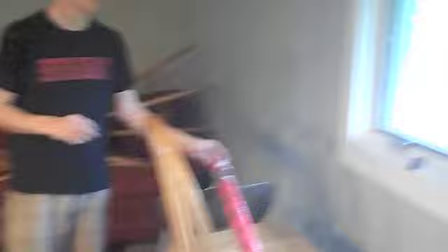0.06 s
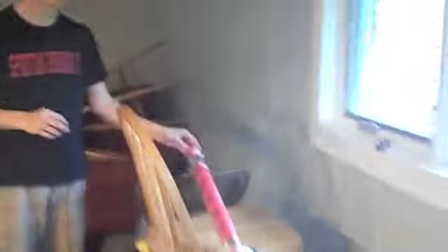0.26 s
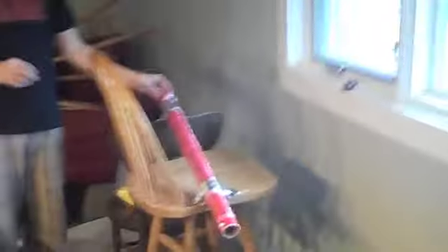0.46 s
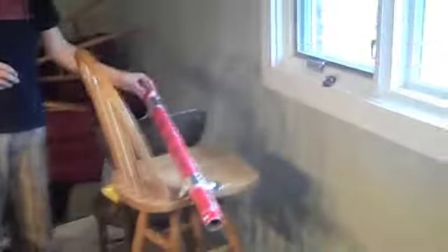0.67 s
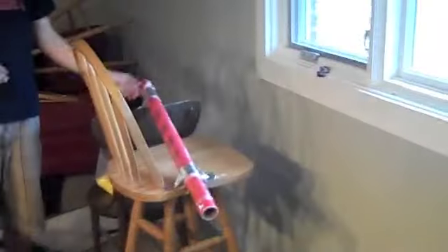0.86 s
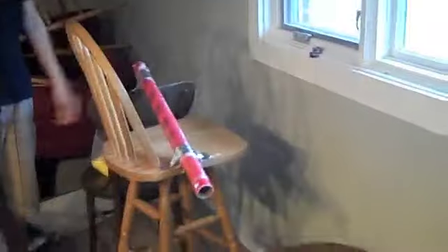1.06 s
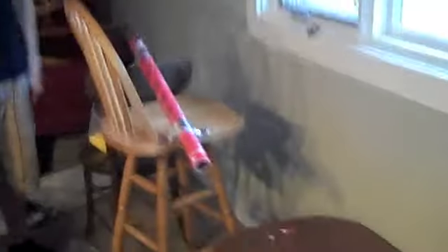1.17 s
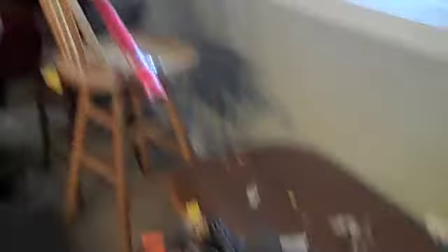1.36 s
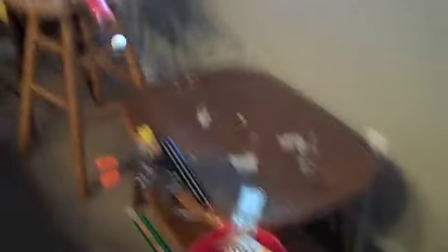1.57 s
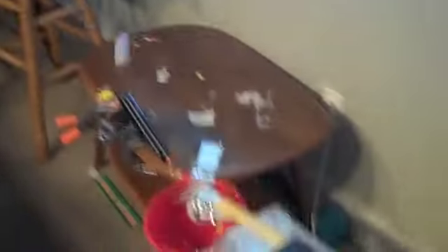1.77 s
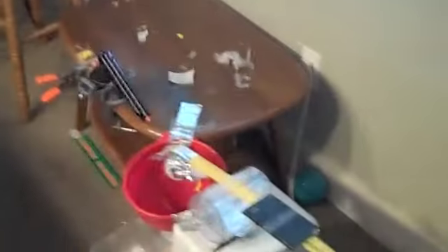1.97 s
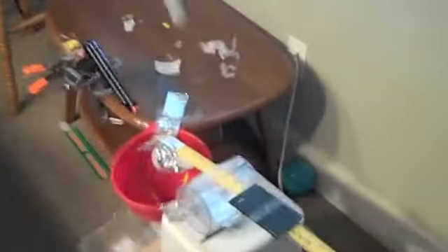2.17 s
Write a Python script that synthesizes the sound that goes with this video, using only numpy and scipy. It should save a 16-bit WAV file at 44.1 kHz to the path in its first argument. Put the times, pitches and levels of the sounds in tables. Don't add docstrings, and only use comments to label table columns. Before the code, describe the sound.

A spring mousetrap snaps at about 1.7 seconds: a sudden loud, bright metal clack, several contacts chattering within a twentieth of a second over hollow wooden knocks, then a short bare-room ring. Before it, tiny dry handling ticks come near 0-0.35 and 0.75 seconds, and a hard ball rumbles faintly down a cardboard tube from 0.8, swelling until 1.6. Quiet low room noise continues; a faint rustle follows at 2.15.

```python
import sys
import numpy as np
from scipy import signal
from scipy.fft import rfft, irfft
from scipy.io import wavfile
from scipy.ndimage import uniform_filter1d

SR = 44100
rng = np.random.default_rng(int(sys.argv[2]) if len(sys.argv) > 2 else 0)


def unload_wav(signal):
    wavfile.write(
        sys.argv[1],
        SR,
        np.round(np.clip(np.atleast_2d(signal).T, -1, 1) * 32767).astype(np.int16),
    )


def elevation(decibels):
    levels = np.asarray(decibels, float)
    return 10 ** (levels / 20)


N = 97593


def rms_one(x):
    return x / np.sqrt(np.mean(x ** 2) + 1e-20)


def at_hz(points, hz):
    table_hz, value = np.transpose(points)
    return np.interp(np.log(hz), np.log(table_hz), value)


def drift(rate_hz):
    r = np.exp(-80 * np.pi * rate_hz / SR)
    slow = signal.lfilter([1], [1, -2 * r, r * r], rng.standard_normal(N // 40 + 2002))[2000:]
    return np.interp(np.arange(N) / 40, np.arange(len(slow)), rms_one(slow))


def resonance(x, hz, width_hz):
    r = np.exp(-np.pi * width_hz / SR)
    b = np.array([1, 0, -1]) * (1 - r * r) / 2
    return signal.lfilter(b, [1, -2 * r * np.cos(2 * np.pi * hz / SR), r * r], x + 1e-18)


def ring(x, hz, t60_s):
    r = elevation(-60 / (t60_s * SR))
    w = 2 * np.pi * hz / SR
    return signal.lfilter([0, np.sin(w)], [1, -2 * r * np.cos(w), r * r], x + 1e-18)


def band(x, low_hz, high_hz):
    sos = signal.butter(2, [low_hz, min(high_hz, 0.45 * SR)], "band", fs=SR, output="sos")
    return signal.sosfilt(sos, x + 1e-18)


def grains(shape, rate_per_s, spread_db20):
    size = elevation(spread_db20 * np.minimum(rng.exponential(1, shape), 4)) * rng.choice([-1, 1], shape)
    return rms_one(size * (rng.random(shape) < rate_per_s / SR))


def stereo_bands(likeness, gain):
    out = 0
    edges_hz = 22 * 2 ** np.arange(0, 9.6, 0.5)
    white = rng.standard_normal((2, 2, N))
    for k, (low_hz, high_hz) in enumerate(zip(edges_hz, edges_hz[1:])):
        mid, side = band(white[k % 2], low_hz, high_hz)
        hz = np.sqrt(low_hz * high_hz)
        alike = np.clip(at_hz(likeness, hz), -1, 1)
        out = out + gain(hz) * (np.sqrt(1 + alike) * mid + np.sqrt(1 - alike) * side * [[1], [-1]])
    return out


def rattle(rows, band_hz, cycles, pan_db, dull_db):
    alike = 0.46
    shared, left, right = grains((3, N), 14000, 1.1)
    spray = np.sqrt(alike) * shared + np.sqrt(1 - alike) * np.array([left, right])
    out = np.zeros((2, N))
    t = np.arange(SR // 4) / SR
    for s, db, length_s, hz, ring_db in rows:
        i = int(s * SR)
        n = min(len(t), N - i)
        rise_s = 0.00014 + 4.2 * length_s ** 2
        shape = (np.exp(-t / length_s) * (1 - np.exp(-t / rise_s)))[:n]
        energy = np.sum(shape ** 2)
        burst = spray[:, i:i + n] * shape
        burst = burst * np.sqrt(energy / np.sum(burst ** 2, axis=1, keepdims=True))
        t60_s = cycles / hz
        tone = ring(burst, hz, t60_s)
        ring_energy = energy * t60_s * SR / (4 * np.log(1000))
        tone = tone * np.sqrt(ring_energy / np.mean(np.sum(tone ** 2, axis=1)))
        dull = band(burst.mean(axis=0), 550, 2600)
        sound = band(burst, *band_hz) + elevation(dull_db) * dull + elevation(ring_db) * tone
        out[:, i:i + n] += elevation(db) * sound * elevation([[pan_db / 2], [-pan_db / 2]])
    return out


def trap_wire():
    # (time [s], level [dB], rattle length [s], ringing pitch [Hz], ring level [dB])
    contacts = [(1.7134, -13.5, 0.0017, 3794, -18), (1.7154, -16, 0.0019, 7900, -21.5),
                (1.7178, -20, 0.006, 5200, -22), (1.7232, -1.5, 0.0033, 8200, -28),
                (1.7258, -9.5, 0.0061, 6510, -21), (1.7402, -6, 0.0027, 6370, -12),
                (1.7415, -8.5, 0.0019, 4330, -5), (1.7432, -10, 0.0035, 7560, -19),
                (1.7448, -9, 0.0011, 6430, -21), (1.750, -13, 0.0065, 10080, -9.5),
                (1.7512, -13.5, 0.0025, 6260, -21), (1.7535, -11, 0.003, 7530, -23),
                (1.7558, -16, 0.0021, 6470, -24), (1.760, -18, 0.034, 5845, -29),
                (1.7838, -22.5, 0.0015, 7570, -24.5), (1.7853, -19.5, 0.003, 7700, -24.5),
                (1.7962, -25, 0.0028, 6200, -10)]
    return rattle(contacts, band_hz=(1420, 8200), cycles=36, pan_db=0.1, dull_db=2)


def wooden_base():
    # (time [s], level [dB], pitch [Hz], t60 [s])
    base_knocks = [
        (1.7135, -24.5, 852, .02),
        (1.7243, -6.5, 646, 0.031),
        (1.7315, -4, 821.4, .05),
        (1.7339, -4, 847, 0.016),
        (1.7440, -7.5, 748, 0.019),
    ]
    # (pitch [Hz], level [dB], t60 [s])
    body_modes = [(131, -32, 0.28), (265, -14, .06), (393, -24.5, 0.11), (472, -27.5, 0.18),
                  (552, -25.5, 0.33), (1105, -15, 0.057), (1380, -28, 0.12), (1457, -5.5, 0.036),
                  (1638, -25, .15), (1804, -18, 0.081), (2095, -13.5, 0.032), (2700, -16.5, 0.02),
                  (3255, -28.5, .2)]
    out, clicks = np.zeros(N), np.zeros(N)
    for s, db, hz, t60_s in base_knocks:
        one = np.zeros(N)
        one[int(s * SR)] = -elevation(db)
        out += ring(one, hz, t60_s)
        clicks += one
    for hz, db, t60_s in body_modes:
        out += elevation(db) * ring(clicks, hz, t60_s)
    return band(out, 218, 6000)


def rolling_ball():
    # (time [s], level [dB])
    roll_level = [
        (0.8, -72.5),
        (1.015, -63),
        (1.152, -56),
        (1.2, -56.5),
        (1.425, -52.5),
        (1.438, -54.5),
        (1.575, -51.5),
        (1.652, -63.5),
        (1.7, -62),
    ]
    # (pitch [Hz], width [Hz], level [dB], peak time [s], spread [s])
    tube_modes = [(100, 30, -6, 1.2, .07), (110, 25, -5, 1.49, .04), (225, 25, -7, 1.23, .07),
                  (205, 20, -6, 1.4, .06), (332, 16, 1, 1.13, .06), (435, 16, -1, 1.11, .07),
                  (365, 22, -1, 1.28, .07), (410, 18, -1, 1.365, .035), (430, 16, 1, 1.425, .035),
                  (355, 18, -4, 1.43, .06), (392, 18, -1, 1.52, .045), (425, 14, 1, 1.59, .055),
                  (520, 35, -7, 1.52, .03), (545, 40, -11, 1.22, .07), (560, 40, -10, 1.37, .04),
                  (670, 35, -6, 1.49, .035), (665, 30, -10, 1.25, .09), (870, 45, -13, 1.53, .05),
                  (1020, 70, -6, 1.275, .05), (1020, 80, -7, 1.43, .065), (1020, 70, -13, 1.1, .06),
                  (1350, 250, -16, 1.34, .05), (2190, 90, -17, 1.27, .025), (2170, 70, -21, 1.16, .03),
                  (2220, 90, -23, 1.4, .035), (1580, 90, -22, 1.3, .05), (1580, 80, -21, 1.5, .05),
                  (300, 50, -2, .92, .07), (420, 40, -3, .96, .07), (195, 35, -2, .97, .06)]
    evenness = 0.9
    s, db = np.transpose(roll_level)
    t = np.arange(N) / SR
    bumps = band(grains((2, N), 360, 0.57), 60, 3000)
    body = 0
    for k, (hz, width_hz, level_db, peak_s, spread_s) in enumerate(tube_modes):
        mode = resonance(bumps[k % 2], hz, width_hz * 1.6)
        mode = rms_one(resonance(mode, hz, width_hz * 1.6))
        mode = mode / (uniform_filter1d(mode ** 2, size=2600) + 0.064) ** (evenness / 2)
        swell = np.exp(-np.abs((t - peak_s) / spread_s) ** 3 / 2)
        body = body + elevation(level_db - 0.3 * drift(18)) * swell * mode
    grit = elevation(-8.5 + 1.7 * drift(15)) * rms_one(band(rng.standard_normal(N), 100, 540))
    scrape = elevation(-23) * rms_one(band(rng.standard_normal(N), 1500, 5900))
    return elevation(np.interp(t, s, db, left=-99, right=-99)) * (body + grit + scrape)


def handling_ticks():
    # (time [s], level [dB], length [s], pitch [Hz], ring level [dB])
    small_contacts = [(.001, -66, 0.012, 7450, -25), (.0175, -48, 0.0024, 5050, -14),
                      (.0215, -56, 0.002, 7500, -9.5), (.021, -58.5, 0.0034, 1300, -7.5),
                      (.026, -64.5, 0.008, 1070, -18), (.031, -55, 0.004, 1060, -26),
                      (.069, -67.5, 0.013, 7400, -2), (.0785, -54, 0.0026, 6950, -3),
                      (.080, -61.5, 0.0026, 4200, -3), (.084, -71.5, .02, 1060, -6.5),
                      (.0935, -59.5, 0.0034, 9000, 0.5), (.215, -51.5, 0.0041, 4960, -37),
                      (.2535, -55, 0.0037, 7300, -7), (.266, -57, 0.0061, 7600, -10),
                      (.277, -63, 0.02, 6700, -7), (.283, -72.5, 0.027, 4260, -9),
                      (.256, -69, 0.03, 2300, -25), (.305, -60, 0.0056, 8800, -6),
                      (.317, -61.5, 0.009, 7900, -12), (.345, -67, 0.0051, 7040, -15),
                      (.7505, -54, 0.0043, 7160, -7), (.756, -58, 0.0034, 3150, 1),
                      (.7562, -69, .004, 7400, -14), (.759, -58, 0.0034, 5640, -1),
                      (.7645, -48, 0.0022, 7800, -23), (.7695, -65, 0.0032, 7600, -8),
                      (.772, -70, 0.002, 3150, 1), (1.038, -70.5, 0.0038, 7400, 5.5),
                      (1.12, -70.5, 0.0032, 7240, 5.5), (1.35, -71.5, 0.036, 6500, -10),
                      (1.39, -71, 0.031, 3500, -7), (1.4505, -54, .004, 1924, -12.5),
                      (1.452, -65, .004, 1330, -7.5), (1.462, -65.5, 0.035, 2584, -30.5),
                      (1.51, -59.5, 0.017, 7600, -26), (1.536, -74.5, 0.0046, 8500, 6),
                      (2.15, -57, 0.073, 1990, -20.5)]
    return rattle(small_contacts, band_hz=(860, 7000), cycles=18, pan_db=2.5, dull_db=-0.5)


def all_round(x):
    spectrum = rfft(x)
    power = np.abs(spectrum) ** 2 + 1e-12
    broad = uniform_filter1d(power, size=900)
    fine = uniform_filter1d(power, size=40)
    even = irfft(spectrum * (broad / fine) ** 0.4, len(x))
    return even * (np.arange(len(x)) >= np.argmax(np.abs(x) > 1e-6))


def room_tail():
    # (frequency [Hz], left-right likeness [-1..1])
    tail_alike = [(60, 0.31), (180, 0.95), (540, 0.93), (1600, 0.75), (4800, -0.16), (14400, 0.52)]
    # (frequency [Hz], t60 [s])
    tail_t60 = [(60, 0.15), (250, 0.34), (700, 0.34), (1500, 0.41), (4000, 0.45), (8000, 0.36),
                (14000, 0.36)]
    # (frequency [Hz], level [dB])
    tail_colour = [(60, 1.5), (250, 12.5), (700, -2), (1500, 4), (4000, -2), (8000, 3), (14000, 5.5)]
    late_db, late_slower, build_s = -34.5, 2.9, 0.00067
    t = np.arange(N) / SR

    def decay(hz):
        fall_db = -60 * t / at_hz(tail_t60, hz)
        return elevation(at_hz(tail_colour, hz)) * (elevation(fall_db) + elevation(late_db + fall_db / late_slower))

    tail = stereo_bands(tail_alike, decay) * (1 - np.exp(-t / build_s))
    return tail / np.sqrt(np.sum(tail ** 2) / 2)


def ports(x):
    # (resonance [Hz], width [Hz], lift [dB])
    port_peaks = [(7900, 1200, 11), (6200, 3100, 9)]
    left, right = [c + (elevation(db) - 1) * resonance(c, hz, width_hz)
                   for c, (hz, width_hz, db) in zip(x, port_peaks)]
    dull = signal.sosfilt(signal.butter(4, 8800, fs=SR, output="sos"), right)
    return np.array([left, dull + elevation(-15) * (right - dull)])


def quiet_floor():
    # (frequency [Hz], level [dB per Hz])
    floor_colour = [(15, -30), (25, -1.5), (158, -3), (242, -2.5), (381, -6.5), (511, -8.5), (1370, -18.5),
                    (13300, -31.5), (14800, -49.5)]
    # (frequency [Hz], left-right likeness [-1..1])
    floor_alike = [(60, 0.24), (240, 0.74), (930, 0.22), (3650, 0.045), (14400, 0.033)]
    level_db, pan_db = -62.5, 3.5
    noise = stereo_bands(floor_alike, lambda hz: elevation(at_hz(floor_colour, hz) + 0.33 * drift(1.3)))
    return elevation(level_db + np.array([[0.5], [-0.5]]) * pan_db) * rms_one(noise)


def scene():
    wire, wood = trap_wire(), wooden_base()
    ball, ticks = rolling_ball(), handling_ticks()
    sent = elevation(-7.5) * (all_round(wire[0]) + elevation(-3) * wood)
    sent = sent + elevation(-5) * ticks[0] + elevation(-7) * ball
    room = signal.fftconvolve(sent[None], room_tail(), axes=1)[:, :N]
    return ports(wire + wood + ticks + ball + room) + quiet_floor()


def band_limit(x):
    return signal.sosfilt(signal.butter(12, 14950, fs=SR, output="sos"), x)


def record(dry):
    clip_top, cutoff_hz = 1.05, 14200
    late = np.array([np.append([0, 0], dry[0, :-2]), dry[1]])
    flattened = clip_top * np.tanh(late / clip_top)
    low_pass = signal.ellip(10, 1, 50, cutoff_hz, fs=SR, output="sos")
    return band_limit(signal.sosfilt(low_pass, flattened))


dry = scene()
out = record(dry)
unload_wav(out)
```